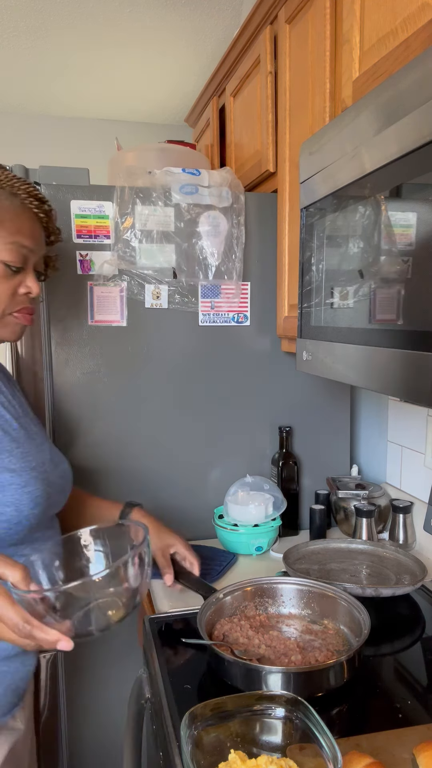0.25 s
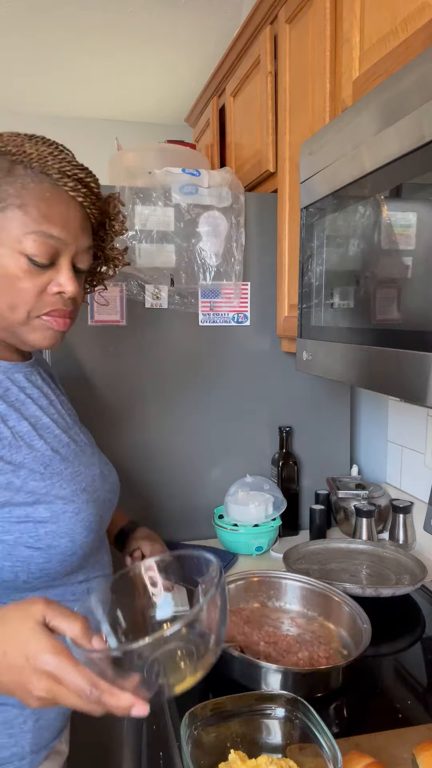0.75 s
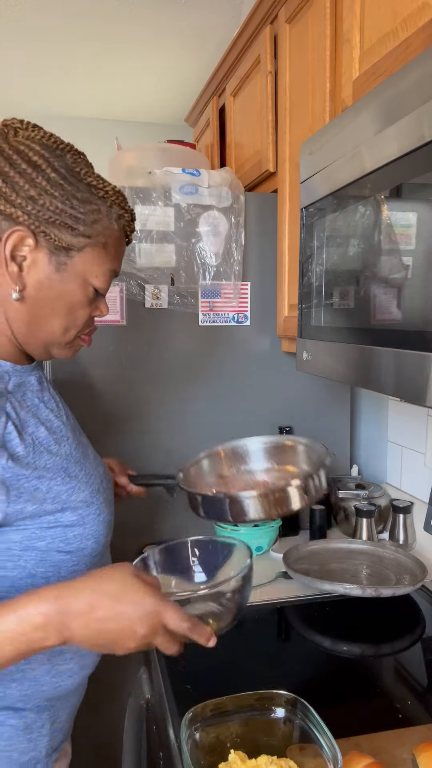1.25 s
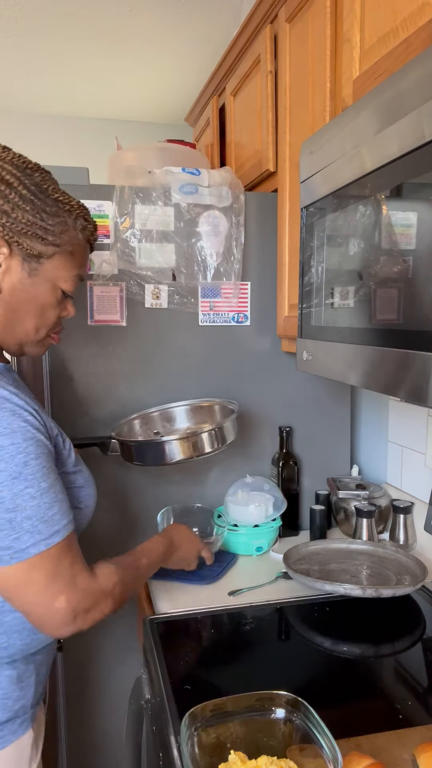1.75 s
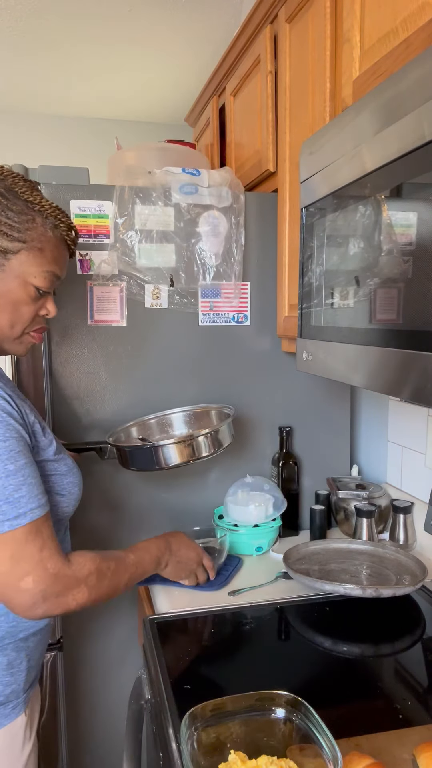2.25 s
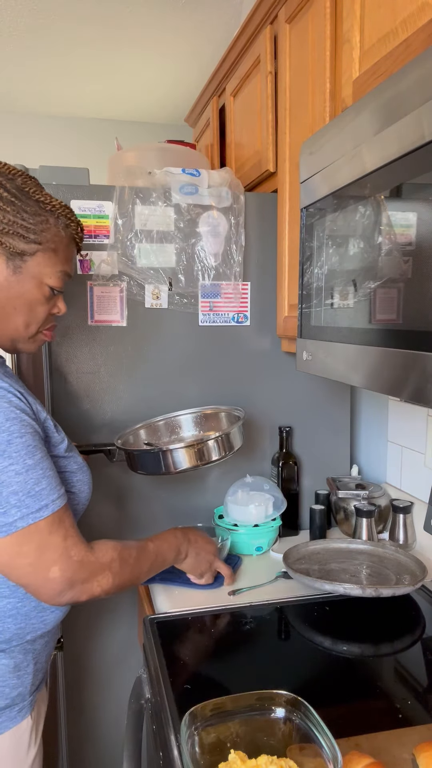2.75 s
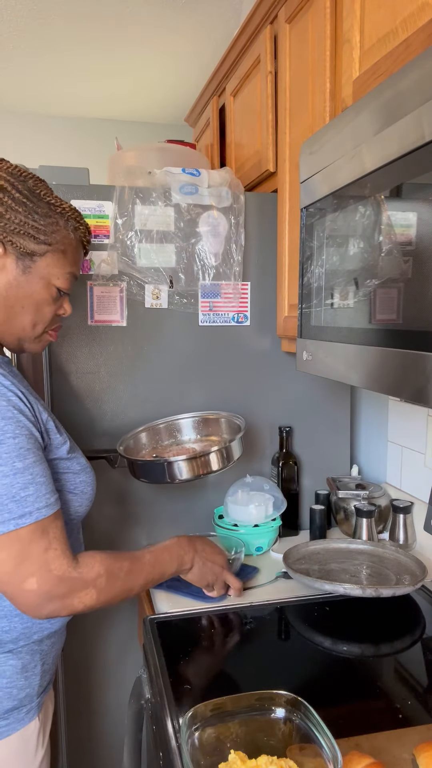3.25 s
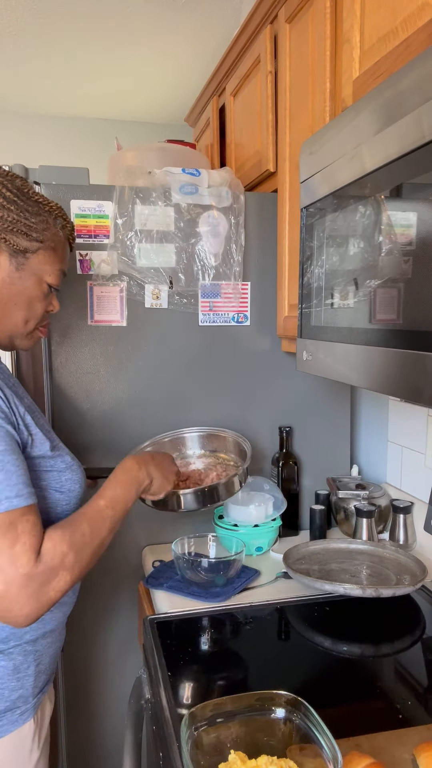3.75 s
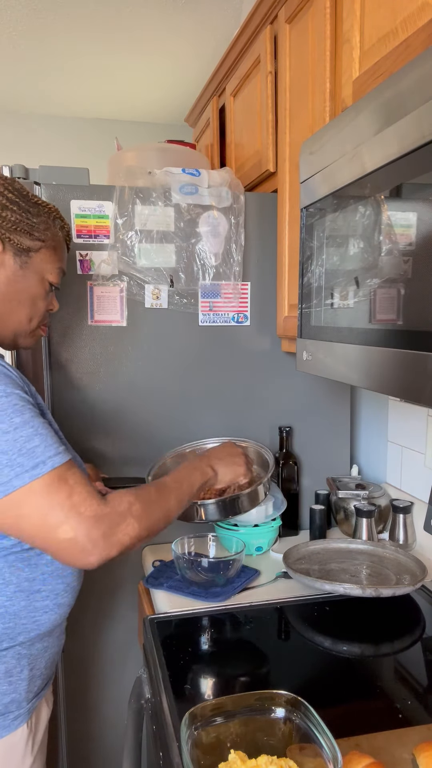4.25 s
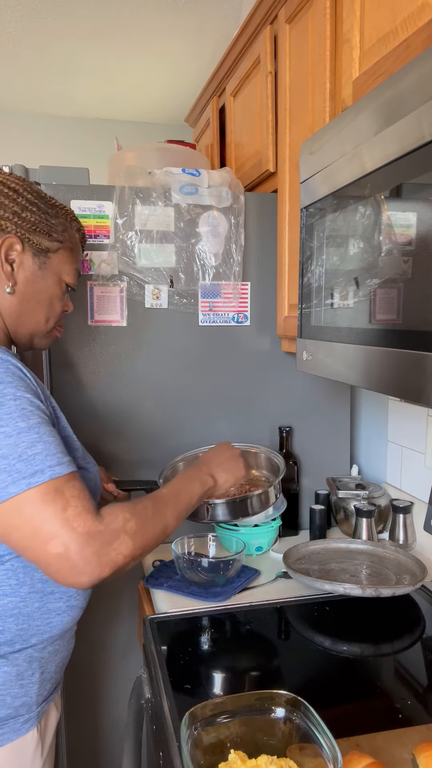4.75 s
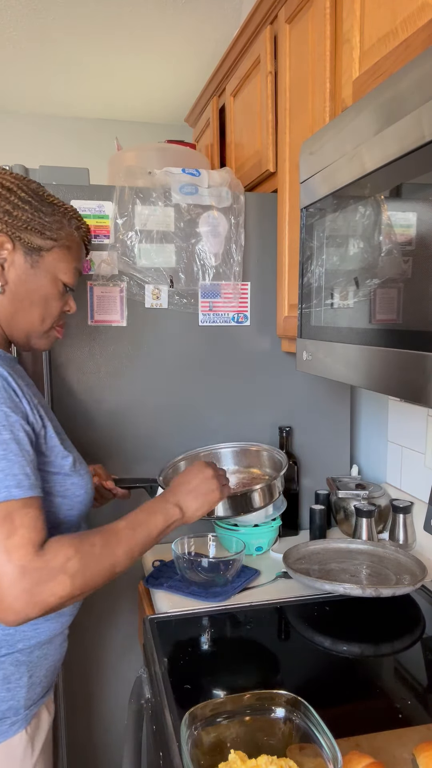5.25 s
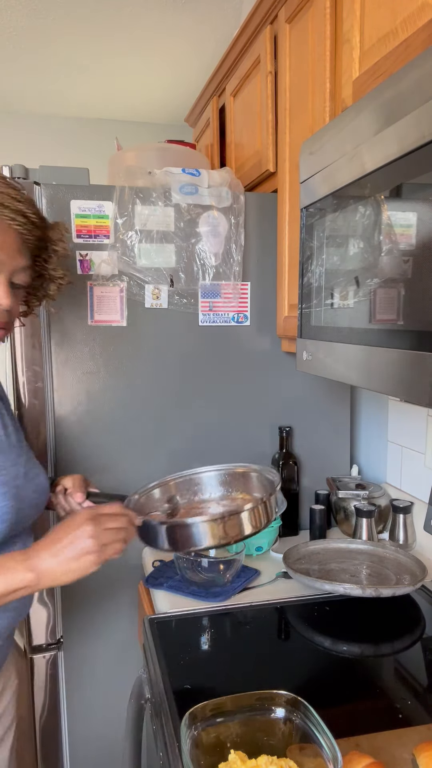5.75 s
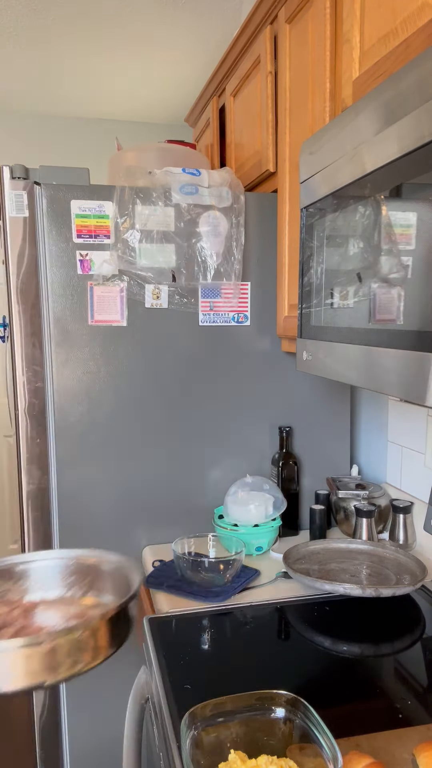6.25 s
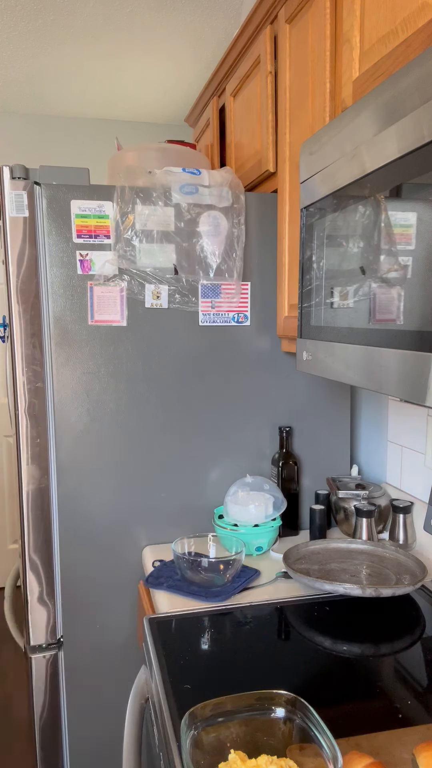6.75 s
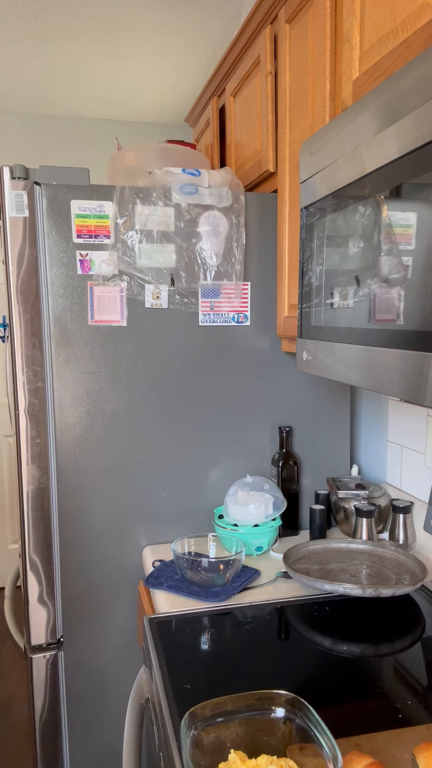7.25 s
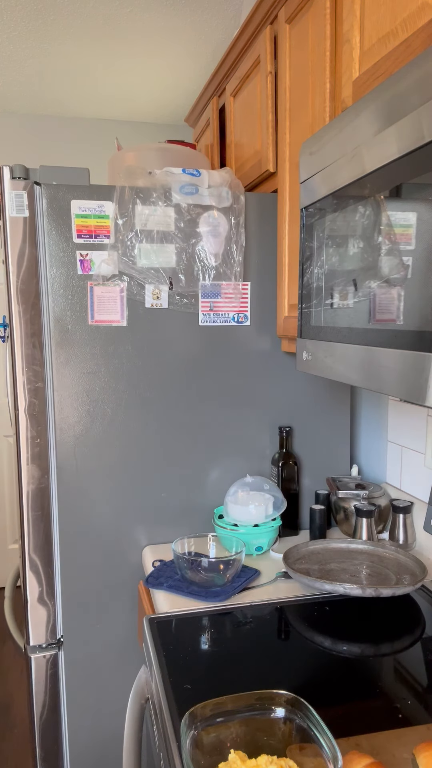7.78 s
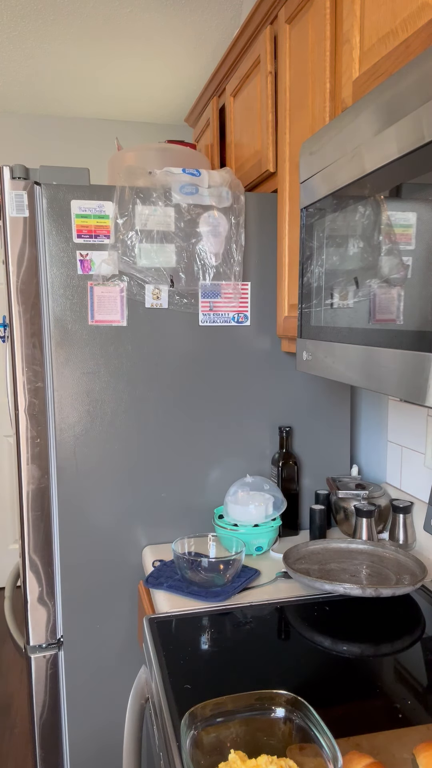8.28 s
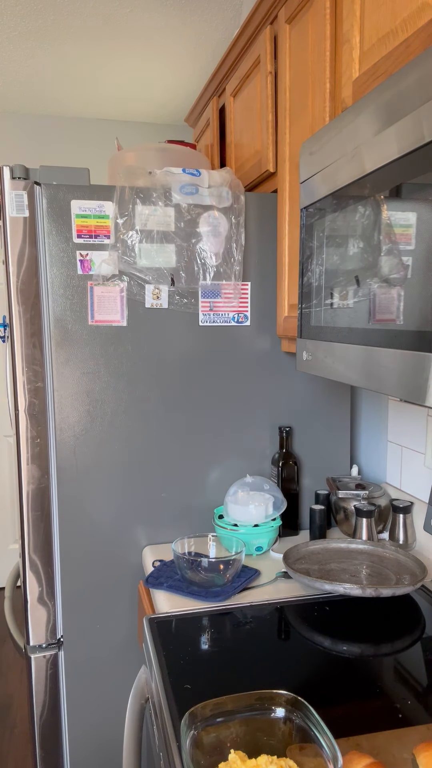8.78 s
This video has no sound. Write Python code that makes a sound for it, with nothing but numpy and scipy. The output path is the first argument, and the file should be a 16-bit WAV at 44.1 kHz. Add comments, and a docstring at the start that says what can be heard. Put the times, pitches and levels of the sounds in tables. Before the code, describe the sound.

Close kitchen sounds: a knock on glass, a hard spoon clack and gritty scrapes, four bright pan rings, a metallic sink rattle over low hum.

```python
"""Scraping out a pan in a small kitchen

A faintly sizzling steel pan is lifted off a glass cooktop, scraped with a spoon and tapped four times on its rim.
The spoon then drops into a steel sink and rattles to rest; things are handled nearby while an appliance hums.
Struck things are made of dying sine waves plus short noise bursts; rubbing, sizzle and air are shaped noise.
Scraping is an uneven train of clicks through resonances. The sound is wide, the left a little louder."""
import sys
import numpy as np
from scipy import signal
from scipy.fft import rfft, irfft
from scipy.io import wavfile
from scipy.ndimage import uniform_filter1d

SR = 44100
rng = np.random.default_rng(int(sys.argv[2]) if len(sys.argv) > 2 else 0)


def to_wav(s):
    """Save 16-bit WAV."""
    ch = np.atleast_2d(s).T  # columns
    pcm = np.round(np.clip(ch, -1, 1) * 32767)  # PCM
    wavfile.write(sys.argv[1], SR, pcm.astype(np.int16))


N = 397770
TIME = np.arange(N) / SR
RING_TIME = np.arange(SR * 3 // 4) / SR  # time since a contact, in seconds
RING_WET_DB = -7  # level of the room in the ring of steel

# Noise colour of a knock on the glass cooktop. Each row: frequency in Hz, relative level in dB per Hz.
COOKTOP_CRACK = [(50, -32), (130, -1.5), (260, 2), (450, 4), (850, -1.5), (1400, -4.5), (2500, -14.5),
                 (3500, -10), (4200, -12), (5300, -17), (8000, -30), (12000, -22), (14200, -24),
                 (16000, -31)]
# Noise colour of a knock on the pan floor. Each row: frequency in Hz, relative level in dB per Hz.
FLOOR_CRACK = [(100, -32), (330, -30), (540, -10), (820, -3), (1400, -4), (1950, 1), (2700, -4), (4200, -8),
               (5600, -7), (8600, -12), (12000, -20), (14050, -10), (15900, -22)]


def amp(db):
    """Turns decibels into a gain."""
    return 10 ** (np.asarray(db) / 20)


def evened(x):
    """Scales a sound to an average (rms) level of 1."""
    return x / np.sqrt(np.mean(x ** 2) + 1e-20)


def read(points, hz):
    """Reads a table between its rows, on a log-frequency axis."""
    f, value = np.transpose(points)
    return np.interp(np.log(hz + 1), np.log(f + 1), value)


def shaped(x, gain):
    """Filters a sound by a gain that depends on frequency."""
    spectrum = rfft(x) * gain(np.fft.rfftfreq(x.shape[-1], 1 / SR))
    return irfft(spectrum, x.shape[-1])


def octaves(hz):
    """Octaves above roughly 2000 Hz, used to tilt a sound brighter or duller."""
    return np.log2((hz + 100) / 2000)


def add(mix, s, sound):
    """Mixes a sound in at time s, in seconds."""
    part = mix[round(s * SR):][:len(sound)]
    part += sound[:len(part)]


def hump(hz, centre_hz, width_hz):
    """Is 1 at the centre and falls towards 0 on both sides."""
    return 1 / (1 + ((hz - centre_hz) / width_hz) ** 2)


def skirts(modes, hz):
    """Lift in dB around each mode: resonances are broad while two pieces of steel touch."""
    lift_db, half_width_hz = 9, 100
    return lift_db * np.max([hump(hz, mode[0], half_width_hz) for mode in modes], axis=0)


def stroke(start, length, attack, release):
    """Loudness of one movement: it rises just before its start, holds for its length, then dies away."""
    t = TIME - start
    rise = np.clip(1 + t / attack, 0, 1) ** 2
    return rise * np.exp(-np.maximum(t - length, 0) / release)


def ring(modes, colour=lambda hz: 0, damping=1, detune=0):
    """Dying modes of a struck body, near rms 1 before colour; a touch damps them and pulls them off pitch."""
    hz, db, t60 = np.transpose(modes)[:, :, None]
    size = amp(db) / np.sqrt(np.sum(amp(db) ** 2) / 2) * amp(colour(hz))
    hz = hz * (1 + detune * rng.uniform(-0.81, 1, hz.shape))
    waves = np.sin(2 * np.pi * (hz * RING_TIME + rng.random(hz.shape)))
    # log(1000) makes each mode fall by 60 dB in t60 seconds
    fall = np.exp(-np.log(1000) * damping * RING_TIME / t60)
    onset = 1 - np.exp(-RING_TIME / 0.00028)
    return (size * fall * waves).sum(0) * onset


def crack(spectrum, t60, colour=lambda hz: 0, snap=0.69, snap_s=0.005):
    """Countless damped modes heard as one gritty burst, with a sharp snap at the instant of contact."""
    grit_db, grit_s = 4, .0007  # depth and grain of the roughness
    grain_times = np.arange(0, 1, grit_s)
    grit = amp(grit_db * np.interp(RING_TIME, grain_times, rng.standard_normal(len(grain_times))))
    noise = grit * rng.standard_normal(len(RING_TIME))
    burst = evened(shaped(noise, lambda hz: amp(read(spectrum, hz))))
    fall = np.exp(-np.log(1000) * RING_TIME / t60) + snap * np.exp(-RING_TIME / snap_s)
    onset = 1 - np.exp(-RING_TIME / 0.0004)
    return shaped(burst, lambda hz: amp(colour(hz))) * fall * onset


def placed(x, lag_ms, wet_db):
    """Direct sound, lag_ms later on the right (earlier if negative), plus the kitchen's dense reflections."""
    # How long reflections last. Each row: frequency in Hz, time to fall by 60 dB in seconds.
    room_t60 = [(100, 0.83), (500, 0.62), (2000, 0.5), (4000, 0.52), (8000, 0.54), (15000, 0.038)]
    right = shaped(x, lambda hz: np.exp(-2j * np.pi * hz * lag_ms / 1000))
    size = (2, len(RING_TIME))
    echoes = rng.choice([-1., 1.], size) * (rng.random(size) < .12)
    hz, t, z = signal.stft(echoes, SR, nperseg=256)
    fall = np.exp(-np.log(1000) * t / read(room_t60, hz)[:, None])
    tail = signal.istft(z * fall, SR, nperseg=256)[1][:, :len(RING_TIME)]
    # cupboards and worktop close by make the first echoes the strongest
    tail *= (RING_TIME > .003) * (1 + 3.3 * np.exp(-RING_TIME / 0.018))
    tail /= np.linalg.norm(tail, axis=1, keepdims=True)
    room = signal.fftconvolve(x[None], tail, axes=1)[:, :N]
    return np.array([x, right]) + amp(wet_db) * room


def kitchen_hum():
    """Mains hum of an appliance over low rumble and faint hiss; both microphones share the bass."""
    # Steady hum tones. Each row: frequency in Hz, level in dB.
    hum_tones = [(60, -45.5), (86, -61.5), (120, -67.5), (188, -70.5)]
    # Colour of the rumble and hiss. Each row: frequency in Hz, relative level in dB per Hz.
    air_colour = [(20, -35.5), (35, -16.5), (50, 4), (62, -12.5), (75, -13), (100, -22.5), (140, -24),
                  (200, -24.5), (400, -28), (800, -36.5), (2000, -36), (5000, -35.5), (9000, -41),
                  (15000, -39.5)]
    air_db = -51.5
    hum = sum(amp(db) * np.sqrt(2) * np.sin(2 * np.pi * (hz * TIME + rng.random())) for hz, db in hum_tones)
    left, other = (evened(shaped(rng.standard_normal(N), lambda hz: amp(read(air_colour, hz))))
                   for _ in range(2))
    same = lambda hz: 1 / (1 + (hz / 600) ** 2)  # share of the left also heard on the right
    right = shaped(left, same) + shaped(other, lambda hz: np.sqrt(1 - same(hz) ** 2))
    return hum + amp(air_db) * np.array([left, right])


def sizzling(pops_per_s=4000):
    """Tiny bubbles burst in the hot fat, too many to tell apart."""
    # The sizzle is louder whenever the pan is near. Each row: time in seconds, level in dB.
    sizzle_level = [(0, -66), (1.5, -70), (3.5, -76), (5, -66), (6.3, -62), (6.9, -61), (7.6, -80)]
    # Colour of the bubbling. Each row: frequency in Hz, relative level in dB per Hz.
    sizzle_colour = [(1000, -31.5), (4000, -5), (5500, -5.5), (8000, -0.5), (11500, 2.5), (14000, -6.5),
                     (16000, -10)]
    pops = rng.standard_normal((2, N)) * (rng.random((2, N)) < pops_per_s / SR)
    fizz = evened(shaped(pops, lambda hz: amp(read(sizzle_colour, hz))))
    return fizz * amp(np.interp(TIME, *np.transpose(sizzle_level)))


def handling():
    """Hands, cloth and sliding things make grainy noise; each slide has its own brightness and fades as it slows."""
    # Slides. Each row: start in seconds, length in seconds, starting level in dB, brightness in dB per octave.
    rubs = [(0.22, 0.3, -55.5, -2.5), (1.569, 0.049, -53.5, 1.5), (1.986, 0.15, -60.5, -2),
            (3.06, 0.2, -61.5, -5), (5.025, 0.08, -54, 0.5), (5.481, .012, -47, -2),
            (7.827, 0.014, -56, -2), (8.1, 0.11, -51, -0.5), (8.312, 0.16, -58, -8),
            (8.641, 0.2, -47.5, -9.5), (8.684, 0.024, -48.5, 2), (8.872, 0.25, -44, -7)]
    # Colour of the rubbing. Each row: frequency in Hz, relative level in dB per Hz.
    rustle = [(40, -59.5), (100, -3.5), (200, -22), (400, -14), (800, -14), (1500, -4), (3000, -3.5),
              (6000, -12.5), (10000, -18.5), (15000, -15)]
    attack_s, release_s, sag_db_per_s, grain_db = 0.0082, 0.026, 7.5, 2.5
    hz, t, z = signal.stft(rng.standard_normal(N), SR, nperseg=512)
    field = 0  # loudness over frequency and time
    for s, length, db, tilt in rubs:
        colour = evened(amp(read(rustle, hz) + tilt * octaves(hz)))
        envelope = np.interp(t, TIME, stroke(s, length, attack_s, release_s))
        level = envelope * amp(db - sag_db_per_s * np.clip(t - s, 0, length))
        field = field + np.outer(colour, level)
    grain = amp(grain_db * rng.standard_normal(len(t)))
    rubbing = signal.istft(z * field * grain, SR, nperseg=512)[1][:N]
    return placed(rubbing, lag_ms=0.19, wet_db=-9.5)


def pan_lifted():
    """The gripped handle clinks, the pan knocks and bumps the cooktop as it rises, and a bowl is nudged."""
    # Ringing of the handle. Each row: frequency in Hz, relative level in dB, fall by 60 dB in seconds.
    handle = [(749, -15, .2), (1660, 9, .07), (3300, -9, .06), (3600, -4, .06), (4700, -14, .04)]
    # Clinks of the gripped handle. Each row: time in seconds, level in dB, brightness in dB per octave.
    grips = [(0.302, -36.5, 6.5), (0.353, -38, 6.5), (0.372, -46, -3), (0.489, -51, 19)]
    # Ringing of the glass bowl. Each row: frequency in Hz, relative level in dB, fall by 60 dB in seconds.
    bowl = [(835, -11, 0.2), (1160, 1, 0.12), (2080, -6, 0.12), (2750, -2, .05), (3250, 1, .05),
            (4220, -5, .04), (5180, -7, .05)]
    # Nudges of the bowl on its cloth. Each row: time in seconds, level in dB, brightness in dB per octave.
    bowl_touches = [(1.548, -55.5, 8), (1.589, -48, 9.5), (1.624, -51, 7.5), (2.25, -89, -37)]
    # Ringing of the glass cooktop. Each row: frequency in Hz, relative level in dB, fall by 60 dB in seconds.
    cooktop = [(185, -6, .1), (275, -3, .16), (506, -4, .12), (790, 10, .08), (920, 10, .08),
               (1136, -1, .08), (4270, -5, .25)]
    out = np.zeros(N)
    for modes, touches in ((handle, grips), (bowl, bowl_touches)):
        for s, db, tilt in touches:
            clink = ring(modes, lambda hz: tilt * octaves(hz))
            add(out, s, amp(db) * (clink + amp(-22.0) * crack(FLOOR_CRACK, t60=0.057)))
    knock = amp(-20.5) * crack(COOKTOP_CRACK, t60=0.056, snap=0.86)
    add(out, .630, knock + amp(-25) * ring(cooktop))
    bump = crack(COOKTOP_CRACK, t60=0.084, colour=lambda hz: -3.0 * octaves(hz))
    add(out, .686, amp(-41) * bump)
    return placed(out, lag_ms=-0.14, wet_db=-2.0)


def spoon_clack():
    """The spoon meets the pan floor, damped by food, bounces once, and later bumps it dully through the food."""
    # Ringing of the pan floor, damped by food, with the faint long ring of the wall.
    # Each row: frequency in Hz, relative level in dB, fall by 60 dB in seconds.
    pan_floor = [(560, -12, .2), (830, -9, .06), (1480, -5, .14), (1800, -2, .17), (1900, 3, .12),
                 (2040, -1, .17), (2410, -1, .11), (3200, -8, .11), (4700, -7, .12), (5850, -1, .08),
                 (6550, -3, .07), (7630, 0, .06), (12900, 0, .07), (1905, -28, 1.6), (1985, -28, 1.5),
                 (3340, -36, 1.5)]
    out = np.zeros(N)
    first = crack(FLOOR_CRACK, t60=0.093, colour=lambda hz: 1.3 * octaves(hz), snap=1.2)
    add(out, 4.1753, amp(-16.5) * first)
    bounce = crack(FLOOR_CRACK, t60=0.082, colour=lambda hz: -1.4 * octaves(hz), snap=1.0)
    add(out, 4.1785, amp(-15) * bounce + amp(-16) * ring(pan_floor))
    # the dull bump is strongest near 660 Hz
    bump = crack(COOKTOP_CRACK, t60=0.15, colour=lambda hz: -np.abs(np.log2((hz + 1) / 660)) * 17)
    add(out, 4.493, amp(-36.5) * bump)
    return placed(out, lag_ms=-0.17, wet_db=-5.5)


def scraping(slip_hz=459, hiss=0.59):
    """The spoon sticks and slips unevenly over the pan floor, giving clicks and hiss coloured by resonances."""
    # Resonances of the scrape. Each row: frequency in Hz, width in Hz, relative level in dB.
    scrape_body = [(496, 270, 7.5), (580, 88, 0), (740, 310, -11.5), (1120, 500, -29.5)]
    # Strokes of the spoon. Each row: start in seconds, length in seconds, level at the end in dB.
    strokes = [(4.295, 0.075, -41), (4.499, 0.0049, -42), (4.902, 0.015, -56.5), (4.978, .075, -35),
               (5.108, 0.0092, -54)]
    slip_rough = .08  # share by which the slip rate wanders
    attack_s, release_s = 0.0038, 0.013
    press_db_per_s = 135  # the hand presses harder as a stroke goes on
    wander = evened(uniform_filter1d(rng.standard_normal(N), 60))
    cycles = np.cumsum(slip_hz * (1 + slip_rough * wander)) / SR
    slips = np.diff(np.floor(cycles), prepend=0)  # one click per cycle
    drive = evened(slips - slips.mean()) + hiss * rng.standard_normal(N)
    body = shaped(drive, lambda hz: sum(amp(db) / (1 + 2j * (hz - f) / width) ** 2
                                        for f, width, db in scrape_body))
    pressure = 0
    for s, length, db in strokes:
        level_db = db - press_db_per_s * np.clip(s + length - TIME, 0, length)
        pressure = pressure + amp(level_db) * stroke(s, length, attack_s, release_s)
    return placed(evened(body) * pressure, lag_ms=-0.084, wet_db=-5.5)


def steps():
    """Shifting feet make the floor swell softly, as short low tones that rise and fall."""
    # Soft steps. Each row: middle in seconds, frequency in Hz, peak level in dB, length in seconds.
    thuds = [(4.799, 48.4, -42, 0.14), (6.751, 35.4, -45.5, .3), (8.897, 104, -38.5, 0.1)]
    out = np.zeros(N)
    for s, hz, db, length in thuds:
        t = np.arange(0, length, 1 / SR)
        swell = np.sqrt(2) * np.hanning(len(t)) * np.sin(2 * np.pi * hz * t)
        add(out, s - length / 2, amp(db) * swell)
    return out


def rim_taps():
    """The spoon strikes the rim twice per tap; each contact point favours other modes, the last tap is damped."""
    # Ringing of the pan with the spoon on its rim.
    # Each row: frequency in Hz, relative level in dB, undamped fall by 60 dB in seconds.
    pan = [(1176, -16, .25), (1635, -15, .4), (1870, -18, .27), (2267, -8, .16), (2697, -1, .3),
           (2756, -4, .28), (2920, -10, .19), (3150, -6, .2), (3220, 0, .24), (3400, -8, .17),
           (3452, 0, .33), (3880, -8, .16), (4217, -6, .22), (5170, -6, .27), (6280, -3, .3), (7473, 3, .2),
           (8840, -10, .15), (10250, -6, .15), (12560, -9, .14), (13350, -9, .12), (14150, -8, .12),
           (14977, -3, .19)]
    # Noise colour of a knock on the rim. Each row: frequency in Hz, relative level in dB per Hz.
    rim_crack = [(150, -6), (420, -2), (750, -9), (1200, 4), (2000, 7), (2900, 13), (4600, 10), (6200, 9),
                 (8600, 9), (11000, 4), (13800, 10), (15900, 0)]
    # Frequencies in Hz at which the point of contact colours a tap.
    colour_hz = [700, 1250, 1800, 2300, 2750, 3200, 3480, 4220, 5200, 7500, 14500]
    # Taps. Each row: time in seconds, crack level in dB, ring level in dB, damping factor,
    # detuning as a share, then colour in dB at each frequency of colour_hz.
    taps = [(5.502, -28, -16.5, 1, 0, -5, -3, -2, -9, 3, 1, -3, -2, 0, -2, 0),
            (5.6875, -27, -15.5, 1, 0, -4, -2, -4, -5, -2, 0, -2, 3, 1, 1, 0),
            (5.8815, -29, -15.5, .95, 0, -3, -2, -1, 2, -7, 1, 6, -3, 1, 1, 2),
            (6.043, -23, -18.5, 1.4, .025, 1, 3, -1, 2, 1, 3, -4, 0, -2, -4, -8)]
    chatter_s, chatter_db = .0042, 1  # delay of the second strike, and how much louder it is
    cracks, rings = np.zeros((2, N))
    for s, crack_db, ring_db, damping, detune, *colour_db in taps:
        colour = lambda hz: np.interp(hz, colour_hz, colour_db)
        contact = lambda hz: colour(hz) + skirts(pan, hz)
        for delay, db in ((0, 0), (chatter_s, chatter_db)):
            knock = crack(rim_crack, 0.045, contact, snap=4.2, snap_s=.003)
            add(cracks, s + delay, amp(crack_db + db) * knock)
        add(rings, s, amp(ring_db) * ring(pan, colour, damping, detune))
    return placed(cracks, lag_ms=-0.074, wet_db=-0.9) + placed(rings, lag_ms=-0.047, wet_db=RING_WET_DB)


def sink_clatter():
    """Bounces ring spoon and basin; a spoon that is held or lands flat rings less and further off pitch."""
    # Ringing of the free spoon. Each row: frequency in Hz, relative level in dB,
    # undamped fall by 60 dB in seconds.
    spoon_modes = [(2554, -7, .12), (2870, 1, .2), (2925, -1, .21), (3880, -2, .16), (3950, -5, .14),
                   (4300, -5, .14), (5469, -2, .17), (6340, -5, .2), (6950, -7, .18), (7400, -8, .18),
                   (8310, -8, .16), (14250, -4, .17), (14980, -5, .19), (15300, -7, .14)]
    # Ringing of the sink basin. Each row: frequency in Hz, relative level in dB,
    # undamped fall by 60 dB in seconds.
    basin_modes = [(100.7, -2, .2), (150, -5, .2), (234, -8, .25), (355, -5, .2), (467, -1, .11),
                   (556, -1, .12), (717, 0, .13), (940, -2, .1), (1170, -3, .28), (1255, 1, .16),
                   (1432, 6, .15), (1620, 0, .1), (1891, 2, .1), (2300, -12, .15)]
    # Noise colour of the spoon's knock. Each row: frequency in Hz, relative level in dB per Hz.
    spoon_crack = [(500, -22), (1800, -9), (2800, 2), (3500, -3), (4400, -1), (5400, -1), (6100, -7),
                   (8300, -6), (11500, -7), (14500, -1), (15900, -11)]
    # Noise colour of the basin's knock. Each row: frequency in Hz, relative level in dB per Hz.
    basin_crack = [(50, -14.5), (110, 2.5), (200, -4), (420, 4.5), (800, -3.5), (1300, 3), (2000, 4),
                   (3000, -7.5), (5000, -1.5), (9000, -22), (15000, -31.5)]
    # Bounces. Each row: time in seconds, relative spoon level in dB, relative basin level in dB,
    # damping factor, favoured frequency in Hz.
    bounces = [(6.971, -30, -26.5, 1.32, 780), (7.161, -23, -28.5, 1.08, 2900),
               (7.167, -25.5, -28, 1.5, 3900), (7.182, -26, -21.5, 2.3, 1850),
               (7.193, -31, -36.5, 0.5, 5470), (7.243, -35, -29, 0.91, 2900), (7.25, -36.5, -35, 2, 4700),
               (7.265, -33, -26, 2.2, 2900), (7.271, -24.5, -24.5, 0.88, 14500),
               (7.281, -29, -24.5, 1.7, 4280), (7.304, -30.5, -27.5, 1.6, 5470),
               (7.31, -27.5, -20.5, 3.6, 3300), (7.318, -28.5, -20.5, 1.4, 4100),
               (7.324, -30, -23.5, 1.5, 1200), (7.334, -35.5, -24, 0.8, 1430),
               (7.345, -34.5, -30, 0.92, 550), (7.362, -30.5, -28, 0.85, 5470),
               (7.372, -35.5, -29.5, 2.8, 4400)]
    favour_db, favour_width_hz = 10, 220  # lift around the favoured frequency
    spoon_ring_db, basin_ring_db = 9, 1  # ring against crack, before damping
    detune_share = .009  # how far a contact pulls modes off pitch, per unit of damping
    rattle_start_s, rattle_end_s, rattle_db, rattles_per_s = 7.27, 7.39, -30, 70
    cracks, rings = np.zeros((2, N))
    for s, spoon_db, basin_db, damping, favoured_hz in bounces:
        colour = lambda hz: favour_db * hump(hz, favoured_hz, favour_width_hz)
        contact = lambda hz: colour(hz) + skirts(spoon_modes, hz) / damping
        spoon = crack(spoon_crack, 0.03, contact, snap=3, snap_s=.004)
        basin = crack(basin_crack, 0.032, colour, snap=0.96, snap_s=0.0072)
        add(cracks, s, amp(spoon_db) * spoon + amp(basin_db) * basin)
        for modes, db in ((spoon_modes, spoon_db + spoon_ring_db), (basin_modes, basin_db + basin_ring_db)):
            add(rings, s, amp(db) / damping * ring(modes, colour, damping, detune_share * damping))
    # light contacts while the spoon skitters to rest
    for s in np.arange(rattle_start_s, rattle_end_s, 1 / rattles_per_s):
        tick = crack(spoon_crack, 0.015, snap=1.6, snap_s=0.0011)
        add(cracks, s + rng.random() / rattles_per_s, amp(rattle_db) * tick)
    both = placed(cracks, lag_ms=0.21, wet_db=-1.0) + placed(rings, lag_ms=0.19, wet_db=RING_WET_DB)
    return both * amp([[-1], [-4]])  # left and right level in dB


def scene():
    """Adds up all sources at the two microphones."""
    return (kitchen_hum() + sizzling() + handling() + pan_lifted() + spoon_clack()
            + scraping() + steps() + rim_taps() + sink_clatter())


def record(dry):
    """Favours the left; above about 5 kHz the right is mostly the left inverted. Rounds peaks, cuts the top."""
    # Left sound heard inverted on the right. Each row: frequency in Hz, share of the left.
    opposed_share = [(1200, 0), (2500, .05), (4000, .05), (5200, .55), (6000, .85), (6700, 1), (12200, 1),
                     (14200, .89)]
    # Colour of the right's own sound. Each row: frequency in Hz, level in dB before the inverted left joins.
    right_db = [(70, 0), (200, -1.5), (700, -4.5), (1200, -6), (2000, -3), (2800, -1.5), (5000, -3.5),
                (7000, 0), (15000, 0)]
    edge_hz = 16000
    opposed = lambda hz: np.clip(read(opposed_share, hz), 0, 1)
    left, right = dry
    own = shaped(right, lambda hz: amp(read(right_db, hz)) * np.sqrt(1 - opposed(hz) ** 2))
    pair = np.array([left, own - shaped(left, opposed)])
    pair = pair / (1 + pair ** 8) ** (1 / 8)
    low_pass = signal.firwin(255, edge_hz, window=("kaiser", 9), fs=SR)
    return signal.oaconvolve(pair, low_pass[None], "same", axes=1)


dry = scene()
out = record(dry)
to_wav(out)
```